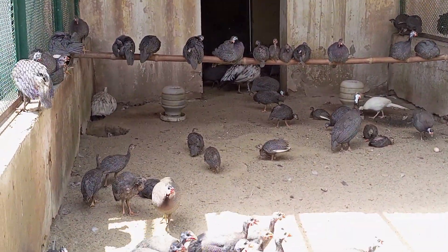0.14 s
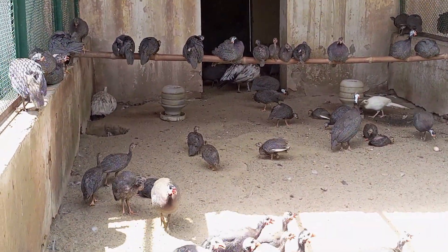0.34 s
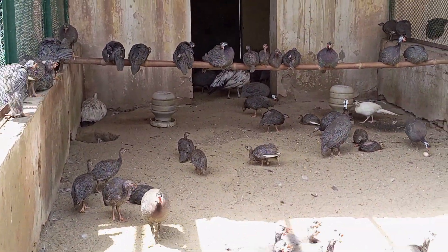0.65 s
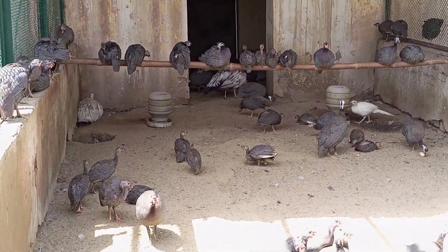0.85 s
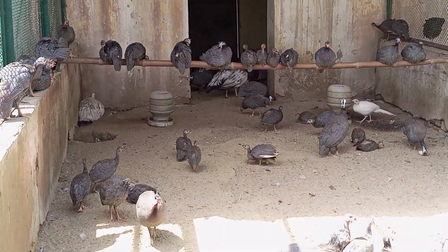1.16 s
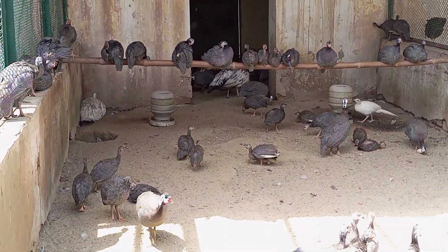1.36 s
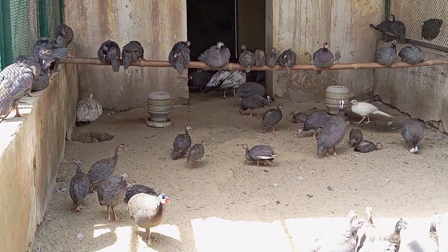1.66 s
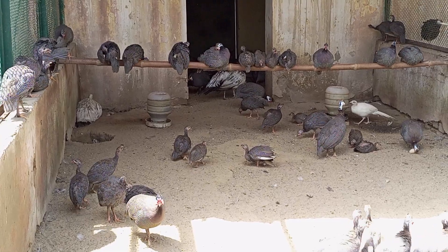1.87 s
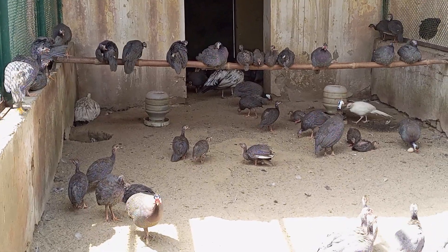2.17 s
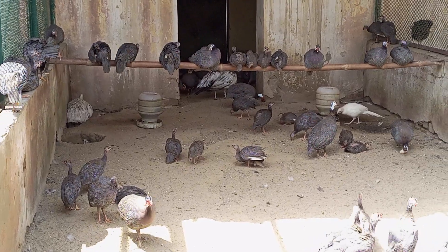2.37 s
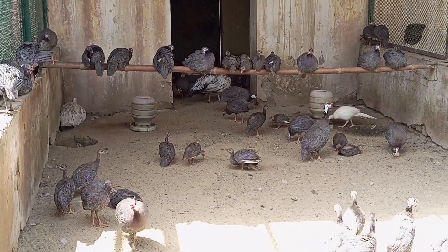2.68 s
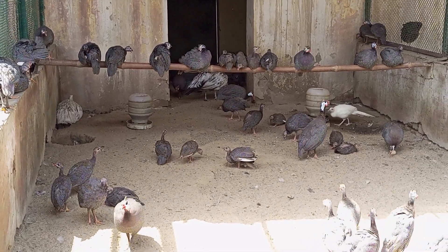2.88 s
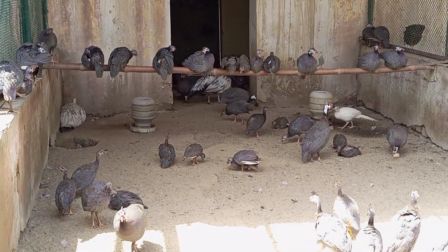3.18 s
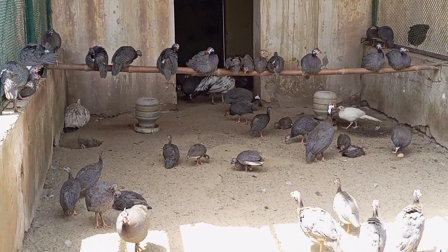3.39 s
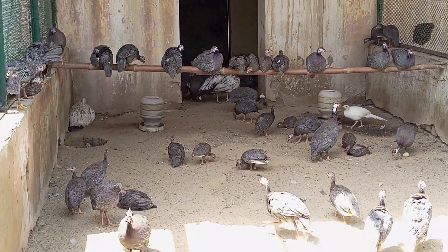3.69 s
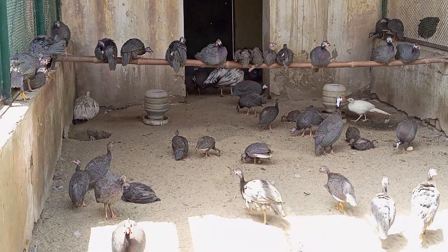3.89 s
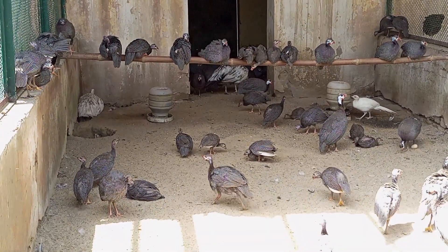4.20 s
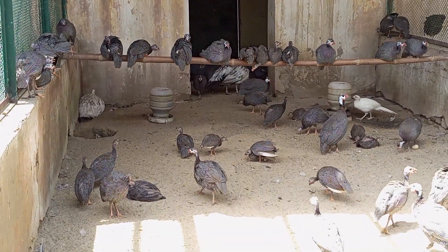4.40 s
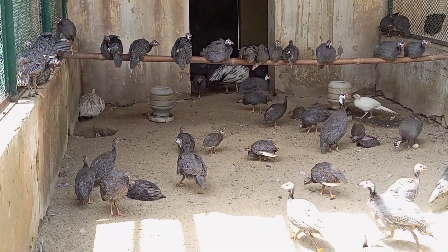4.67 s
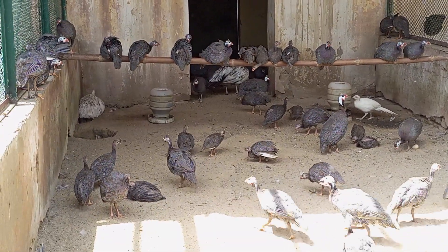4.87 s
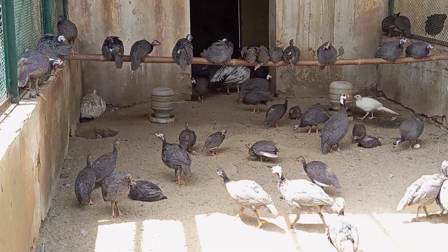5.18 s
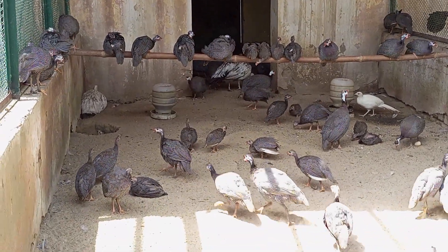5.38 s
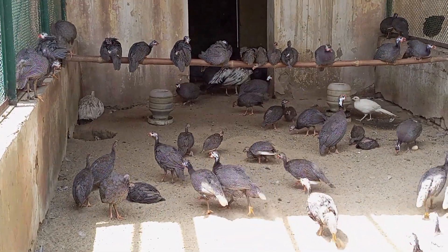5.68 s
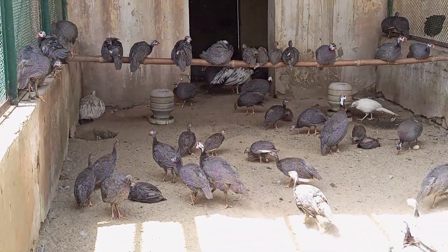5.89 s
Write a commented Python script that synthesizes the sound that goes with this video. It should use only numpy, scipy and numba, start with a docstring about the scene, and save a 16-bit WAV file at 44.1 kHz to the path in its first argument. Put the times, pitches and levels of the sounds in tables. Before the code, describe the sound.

A flock of guinea fowl calls in a concrete-walled outdoor pen. Bright, very short chirps jump out in the first second, then rasping squawks come at about one, two and three seconds. After a sparser, quieter stretch, another strong squawk barks just after five seconds and a weaker one near the end. Behind are hoarse wheezes, faint peeps and tiny pecking ticks. The walls give a short echo; the microphone catches a few dull dry taps.

```python
"""Near guinea fowl in a walled outdoor pen give rasping squawks (a buzz through a moving throat resonance)
and short gliding chirps (a sine with bill-coloured overtones). Further back others wheeze (buzz through one
broad resonance) and peep. Low tones (unsteady fundamental and octave) are a far fowl's faint crowing and,
at 5.975 s, the low body hum under a squawk. Beaks and feet tick on the dirt (noise bursts). The walls add
a short echo; a few dry taps at the microphone have none. Filtered noise gives faint outdoor air."""
import sys
import numpy as np
from scipy import signal
from scipy.fft import rfft, irfft, next_fast_len
from scipy.io import wavfile
from scipy.ndimage import uniform_filter1d
from numba import njit

SR = 44100
rng = np.random.default_rng(int(sys.argv[2]) if len(sys.argv) > 2 else 0)


def transcribe(signal):
    """Save signal, clipped to [-1, 1], as a 16-bit WAV file at the path in sys.argv[1]."""
    frames = np.atleast_2d(signal).T
    limited = np.clip(frames, -1, 1)
    pcm = np.round(limited * 32767).astype(np.int16)
    wavfile.write(sys.argv[1], SR, pcm)


N = 266628
TOP_HZ = 15740  # upper band limit


def undb(db):
    """Decibels to gain."""
    return 10 ** (np.asarray(db) / 20)


def unit(x):
    """Scale to rms 1."""
    return x / np.sqrt(np.mean(x ** 2) + 1e-20)


def gain_at(hz, points):
    """Gain of a (Hz, dB) spectrum, joined on a log axis, falling 12 dB/octave more below its first point."""
    point_hz, point_db = np.transpose(points)
    db = np.interp(np.log(hz + 1), np.log(point_hz), point_db)
    return undb(db) * np.minimum(hz / point_hz[0], 1) ** 2


def colour(x, points):
    """Filter a signal by a (Hz, dB) spectrum."""
    size = next_fast_len(len(x) + 512)
    bin_hz = np.arange(size // 2 + 1) * SR / size
    return irfft(rfft(x, size) * gain_at(bin_hz, points), size)[:len(x)]


def wobble(n, rate_hz):
    """Gaussian random values at rate_hz, joined by lines."""
    at = np.arange(n) * rate_hz / SR
    count = int(at[-1]) + 2
    return np.interp(at, np.arange(count), rng.standard_normal(count))


def add(out, start_s, x):
    """Mix a sound in at start_s; a negative start clips its head."""
    i = int(start_s * SR)
    x, i = x[max(-i, 0):], max(i, 0)
    out[i:i + len(x)] += x[:max(len(out) - i, 0)]


def play(table, voice):
    """Lay the calls of a table along the time axis."""
    out = np.zeros(N)
    for start_s, *row in table:
        add(out, start_s, voice(*row))
    return out


def rise_and_fall(length_s, peak_share):
    """Split a call's length at its loudest point."""
    share = np.clip(peak_share, .05, .95)
    return length_s * share, length_s * (1 - share)


def swell(rise_s, fall_s):
    """Time axis and rounded rise and fall of a short call."""
    t = np.arange(int((rise_s + fall_s) * SR)) / SR
    ramp = np.interp(t, [0, rise_s, rise_s + fall_s], [0, 1, 0])
    return t, np.sin(np.pi / 2 * ramp) ** 1.09


# air spectrum: (frequency [Hz], gain [dB])
AIR_SPECTRUM = [(25, -35), (75, -2), (160, -7), (300, -18.5), (800, -25), (1300, -23.5), (1950, -16.5),
                (2600, -25.5), (4000, -12.5), (4900, -13.5), (5900, -28.5), (7500, -32.5), (10000, -47),
                (15000, -50.5)]


def air(level_db=-71.5, swell_db=0.24, swell_hz=0.67):
    """Faint outdoor rumble and hiss: coloured noise, swelling slowly."""
    return unit(colour(rng.standard_normal(N), AIR_SPECTRUM)) * undb(level_db + swell_db * wobble(N, swell_hz))


# low tones: a far fowl's crowing, and at 5.975 s the low hum under a squawk:
# (start [s], length [s], start pitch [Hz], end pitch [Hz], level before pen [dB])
LOW_TONES = [ (-.03, 0.093, 433, 409, -67), (.19, 0.078, 397, 373, -71), (.32, 0.071, 481, 480, -73.5),
             (.64, .14, 823, 783, -76), (1.31, 0.2, 338, 362.3, -68.5), (1.48, 0.54, 506, 497.3, -67.5),
             (1.85, .32, 469, 372, -67.5), (2.18, 0.09, 357, 340, -68), (3.74, 0.15, 725, 659, -74),
             (5.975, .045, 397, 388, -62)]
LOW_PEAK_SHARE, LOW_ARCH_SHARE = 0.5, .025  # loudest point, of length; upward bow, of pitch
LOW_OCTAVE_DB = -18


def low_tone(length_s, start_hz, end_hz, db, waver=0.045, flutter_db=3):
    """Low note of voice or body, unsteady in pitch and strength: a fundamental and a weak octave."""
    t, envelope = swell(*rise_and_fall(length_s, LOW_PEAK_SHARE))
    glide_hz = np.interp(t, [0, length_s], [start_hz, end_hz])
    bow = LOW_ARCH_SHARE * np.sin(np.pi * t / length_s)
    hz = glide_hz * (1 + bow + waver * wobble(len(t), 60))
    phase = 2 * np.pi * np.cumsum(hz) / SR
    tone = np.sin(phase) + undb(LOW_OCTAVE_DB) * np.sin(2 * phase)
    return tone * envelope * undb(db + flutter_db * wobble(len(t), 30.5))


# bill gain on chirp overtones: (frequency [Hz], gain [dB])
CHIRP_BILL = [(1000, -14), (2100, -13), (3200, 1.5), (4100, 9), (5200, -9.5), (6100, -30), (8000, -50),
              (9600, -42.5), (11500, -60), (14000, -63.5)]


def chirp(rise_s, fall_s, start_hz, loudest_hz, end_hz, db, over_db, rough, jitter=0.11, shimmer=0.57):
    """Whistle on a parabolic glide; the bill colours its overtones, roughness makes it quaver."""
    t, envelope = swell(rise_s, fall_s)
    glide = np.polyfit([0, rise_s, rise_s + fall_s], [start_hz, loudest_hz, end_hz], 2)
    hz = np.polyval(glide, t)
    phase = 2 * np.pi * np.cumsum(hz * (1 + jitter * rough * wobble(len(t), 1100))) / SR
    orders = range(2, int(TOP_HZ / loudest_hz) + 1)
    overtones = sum(gain_at(k * hz, CHIRP_BILL) * np.sin(k * phase) for k in orders)
    quaver = 1 + shimmer * rough * wobble(len(t), 800)
    return (np.sin(phase) + undb(over_db) * overtones) * quaver * envelope * undb(db)


# near peeps: (start [s], length [s], pitch when loudest [Hz], glide [octaves], level before pen [dB])
NEAR_PEEPS = [ (-.01, 0.26, 1927, 0.016, -68.5), (.344, 0.036, 3450, 0.14, -46),
              (.378, 0.026, 3600, -.15, -37), (.565, .044, 3656, -.02, -28.5),
              (.755, 0.057, 1880, 0.34, -59), (.88, .16, 2310, 0.23, -54), (.925, .065, 3780, .07, -55),
              (1.44, 0.15, 1385, -0.014, -59), (1.65, 0.22, 2135, 0.13, -57.5),
              (1.808, 0.037, 1852, 0.024, -38.5), (1.85, .06, 2264, .14, -48.5),
              (1.924, 0.035, 4270, 0.05, -45), (1.945, 0.057, 2425, 0, -54.5), (1.95, 0.095, 1865, 0, -50),
              (2.165, 0.051, 3055, -0.18, -51), (2.255, 0.099, 1856, -0.087, -55),
              (2.682, 0.046, 1870, -0.12, -46), (2.7, 0.028, 3418, -0.093, -37),
              (2.82, 0.11, 5630, -0.014, -52.5), (3.335, 0.27, 1236, 0.24, -66.5),
              (3.42, 0.044, 5540, 0.057, -56.5), (3.678, 0.26, 2306, 0.066, -58),
              (4.43, 0.076, 4780, 0.038, -61), (4.47, 0.058, 2250, -0.036, -56),
              (4.964, 0.036, 1918, -0.09, -51.5), (4.983, 0.058, 1366, 0.081, -55),
              (5.124, 0.1, 1378, 0.1, -50), (5.72, 0.038, 1320, 0.15, -56.5),
              (5.75, 0.39, 1330, -0.011, -71)]
PEEP_ATTACK_S, PEEP_OVERTONES_DB, PEEP_ROUGH = .027, -17.5, 0.2  # attack is an upper limit; roughness 0-1


def peep(length_s, hz, octaves, db):
    """Nearly pure chirp on an even glide: a quick rise, then a fade."""
    rise_s = min(PEEP_ATTACK_S, length_s / 2)
    start_hz, end_hz = hz * 2 ** (octaves * (np.array([0, 1]) - rise_s / length_s))
    return chirp(rise_s, length_s - rise_s, start_hz, hz, end_hz, db, PEEP_OVERTONES_DB, PEEP_ROUGH)


def peeping(count=26, mean_db=-75):
    """Birds at the back peep softly at random, on nearly level notes."""
    rows = []
    for when, pitch, glide, loud in rng.random((count, 4)):
        hz = 2400 + 3100 * pitch
        arch_hz = [hz, hz * (1 + .04 * glide), hz * (.97 + .06 * glide)]
        rows.append((when * N / SR, .04, .05, *arch_hz, mean_db + 6 * (loud - .5), -15, .25))
    return play(rows, chirp)


def pecking(count=22, softest_db=-74, spread_db=6.7, decay_s=0.0043):
    """Beaks and claws tick on the dirt: decaying noise bursts at random, levels set before colouring."""
    out, t = np.zeros(N), np.arange(SR // 30) / SR
    for when, loud in rng.random((count, 2)):
        tick = rng.standard_normal(len(t)) * np.exp(-t / decay_s)
        add(out, when * N / SR, tick * undb(softest_db + spread_db * loud))
    return colour(out, [(1000, 2), (4500, -5), (6500, -14), (9000, -5.5), (12000, -33)])


def syrinx(hz, rough, jitter=0.0538, shimmer=0.68, uneven_db=7.0, scatter_rad=2.31, doubling=0.27):
    """Membranes buzz, overtones swelling singly; roughness upsets timing and strength and lets air through."""
    n = len(hz)
    phase = np.cumsum(hz * (1 + jitter * rough * (wobble(n, 490.3) + wobble(n, 91.55)))) / SR
    buzz = 0
    for k in range(1, int(TOP_HZ / hz.max())):
        # the windpipe delays each overtone differently, which smears the pulses
        lag_rad = scatter_rad * (rng.standard_normal() + rough * wobble(n, 110))
        buzz = buzz + undb(uneven_db * wobble(n, 43.9)) * np.cos(2 * np.pi * k * phase + lag_rad)
    # in spells, strong and weak cycles alternate
    alternation = doubling * wobble(n, 57.4) * np.cos(np.pi * phase)
    strength = np.exp(rough * (shimmer * wobble(n, 453.9) + alternation))
    hiss = .3 * unit(np.exp(-2 * (phase % 1)) * rng.standard_normal(n))
    return unit(buzz) * strength + rough * hiss


# hoarse calls further back:
# (start [s], length [s], level before pen [dB], resonance centre [Hz], resonance width [Hz])
WHEEZE_CALLS = [ (.29, 0.18, -70, 1750, 770), (.368, 0.048, -51.5, 3700, 1290),
                (.37, 0.039, -67, 6200, 1020), (.8, 0.22, -70, 1700, 600), (.93, 0.097, -58, 4800, 890),
                (1.06, 0.25, -70, 2700, 726), (1.285, 0.2, -55.5, 3850, 1800),
                (1.41, 0.23, -66, 3500, 2700), (1.625, 0.27, -59.5, 5400, 1115),
                (1.63, 0.23, -59.5, 3820, 1700), (2.11, .23, -76, 7260, 1390),
                (2.15, 0.45, -72.5, 3820, 2480), (3.93, .09, -57, 2800, 650), (3.98, .32, -61, 4400, 1600),
                (4.15, 0.37, -76, 1950, 630), (4.55, .11, -60.5, 4200, 850),
                (4.595, 0.037, -68, 7240, 2220), (4.77, 0.14, -70, 1720, 570),
                (4.76, 0.14, -68.5, 3640, 1010)]
WHEEZE_MEAN_HZ = 489.4  # pulse rate before arch and waver
WHEEZE_PEAK_SHARE, WHEEZE_ARCH_SHARE = .28, .04  # loudest point, of length; upward bow, of pitch


def wheeze(length_s, db, centre_hz, width_hz, rough=0.321, waver=0.026, pitch_spread=0.05):
    """Thin, hoarse call: arching, wavering buzz through one broad resonance, each call on its own pitch."""
    t, envelope = swell(*rise_and_fall(length_s, WHEEZE_PEAK_SHARE))
    bow = WHEEZE_ARCH_SHARE * np.sin(np.pi * t / length_s)
    hz = WHEEZE_MEAN_HZ * (1 + pitch_spread * rng.standard_normal() + bow)
    source = syrinx(hz * (1 + waver * wobble(len(t), 22)), rough)
    shape_hz = np.linspace(500, TOP_HZ, 60)
    shape_db = np.maximum(-12 * ((shape_hz - centre_hz) / width_hz) ** 2, -60)
    return unit(colour(source, np.column_stack([shape_hz, shape_db]))) * envelope * undb(db)


# arching, plunging whistles:
# (start [s], length [s], top pitch [Hz], level before pen [dB], overtones [dB], roughness [0-1])
WHISTLE_CALLS = [ (.36, 0.016, 3870, -31, -9, 0.46), (.518, 0.065, 4837, -27.5, 6.5, 0.13),
                 (1.948, 0.032, 4110, -36, -11, 0.42), (2.645, 0.063, 4600, -58, -18, .15),
                 (2.707, 0.026, 4450, -41.5, -22, 0.77), (3.888, 0.051, 4130, -47, 8, 0.48)]
WHISTLE_PEAK_SHARE = .72  # loudest point, of length
# pitch: (at start [share of top], when loudest [share of top], at end [share of top])
WHISTLE_PITCH_SHARES = (.92, .9, .7)


def whistle(length_s, top_hz, db, over_db, rough):
    """High chirp that grows as it arches over and is loudest as it plunges."""
    arch_hz = top_hz * np.array(WHISTLE_PITCH_SHARES)
    return chirp(*rise_and_fall(length_s, WHISTLE_PEAK_SHARE), *arch_hz, db, over_db, rough)


# dry taps: (start [s], push strength before body [dB])
DRY_TAPS = [(.6135, -4), (2.705, -3), (2.7115, -6.5), (2.788, -8.5)]
# body of a tap: (frequency [Hz], gain [dB])
TAP_SPECTRUM = [(200, -25.5), (400, -5), (580, 1), (900, -2.5), (1400, -19), (2500, -32), (5000, -51)]


def tap(db, rebound_db=-16, rebound_s=0.018):
    """Dull, dead tap: one push and a faint, brief rattle."""
    t = np.arange(SR // 50) / SR
    rattle = rng.standard_normal(len(t)) * np.exp(-t / rebound_s) / np.sqrt(rebound_s * SR / 2)
    push = undb(rebound_db) * rattle
    push[0] += 1
    return push * undb(db)


@njit
def resonance(x, hz, width_hz):
    """State-variable band-pass with a moving centre."""
    y, band, low = np.empty(len(x)), 0., 0.
    for i in range(len(x)):
        g, k = np.tan(np.pi * hz[i] / SR), width_hz / hz[i]
        v = (band + g * (x[i] - low)) / (1 + g * (g + k))
        band, low, y[i] = 2 * v - band, low + 2 * g * v, k * v
    return y


def steady(x, size=400):
    """Even out the loudness of a voice over a few cycles."""
    return x / np.sqrt(np.abs(uniform_filter1d(x ** 2, size)) + 1e-12)


# squawks: soft lead-in, burst, hold, release; at the break the voice jumps to a higher register
# (start [s], lead-in [s], hold [s], release [s], break after [s], lead-in level before pen [dB],
#  burst level before pen [dB], pulse rate at break, before sag [Hz], throat before [Hz], throat after [Hz])
HARSH_CALLS = [ (.935, .068, 0.035, 0.016, 0.098, -55.5, -45.5, 382.5, 1945, 1780),
               (1.99, .076, .022, 0.035, .078, -44, -34, 384.6, 1123, 1920),
               (2.855, 0.057, 0.052, 0.022, .086, -54, -34.5, 437, 1173, 1720)]
BARKED_CALLS = [ (5.142, 0.0906, 0.017, 0.054, .066, -48.5, -32.5, 403.5, 1430, 1670),
                (5.888, .098, .018, .035, .069, -51.5, -47, 405.8, 1440, 1680)]
# rasp colour of each voice: (frequency [Hz], gain [dB])
HARSH_BILL = [(400, -69), (700, -31.5), (1120, -4.5), (1420, -7.5), (1850, 2), (2400, -3), (3700, -3.5),
              (5000, -1.5), (5650, -8), (6400, -26), (7800, -33), (9200, -36), (10500, -36), (12500, -69)]
BARKED_BILL = [(400, -20), (580, -29), (800, -17.5), (1200, -8.5), (1600, -5), (2000, 3), (2600, -4.5),
               (3550, 3.5), (4100, -7.5), (5400, -9), (6400, -21), (7500, -14), (9000, -30), (12500, -62)]
# nearly shut bill, on the rasp: (frequency [Hz], gain [dB])
SHUT_BILL_SPECTRUM = [(900, 0), (5500, 0), (6500, -3), (9000, -3.5), (12000, -16)]
LOW_REGISTER_HZ, BREAK_S, SAG_HZ_PER_S = 371.4, 0.012, 102.6  # pulse rate; jump time; sink after break
ONSET_S, BURST_S, CRESCENDO_DB, SILENT_DB = 0.021, 0.011, 4, -24  # lead-in grows until the burst
LEAD_ROUGH, BURST_ROUGH, DYING_ROUGH = 0.634, .31, .42  # 0-1
START_RASP_DB, LEAD_RASP_DB, BURST_RASP_DB, DYING_RASP_DB = 0, 12, 11, 16  # re throat tone


def squawk(row, bill, throat_width_hz=260., gap_hz=3000., gap_width_hz=1700., open_db=-40, open_span_db=8):
    """Buzz rings a moving throat resonance and rasps broadly as the bill opens; the burst is clearest."""
    lead_s, hold_s, release_s, break_s, lead_db, burst_db, high_hz, throat_before_hz, throat_after_hz = row
    length_s = lead_s + hold_s + release_s
    t = np.arange(0, length_s, 1 / SR)
    stages_s = [0, ONSET_S, lead_s - BURST_S, lead_s, lead_s + hold_s, length_s]
    stages_db = [lead_db + SILENT_DB / 2, lead_db, lead_db + CRESCENDO_DB,
                 burst_db, burst_db, burst_db + SILENT_DB]
    db = np.interp(t, stages_s, stages_db)
    rough = np.interp(t, stages_s[2:], [LEAD_ROUGH, BURST_ROUGH, BURST_ROUGH, DYING_ROUGH])
    rasp_db = np.interp(t, [0, lead_s - BURST_S, lead_s, t[-1]],
                        [START_RASP_DB, LEAD_RASP_DB, BURST_RASP_DB, DYING_RASP_DB])
    jump_s = [break_s - BREAK_S / 2, break_s + BREAK_S / 2]
    sag_hz = SAG_HZ_PER_S * np.maximum(t - break_s, 0)
    hz = np.interp(t, jump_s, [LOW_REGISTER_HZ, high_hz]) - sag_hz
    throat_hz = np.interp(t, jump_s, [throat_before_hz, throat_after_hz])
    source = colour(syrinx(hz, rough), bill)
    tone = resonance(resonance(source, throat_hz, throat_width_hz), throat_hz, throat_width_hz)
    # in the soft start the bill is nearly shut and hollows and muffles the rasp
    shut = np.clip((open_db - db) / open_span_db, 0, 1) * (t < lead_s)
    hollow = source - resonance(source, np.full(len(t), gap_hz), gap_width_hz)
    muffled = colour(hollow, SHUT_BILL_SPECTRUM)
    rasp = (1 - shut) * source + shut * muffled
    voice = steady(steady(tone) + undb(rasp_db) * steady(rasp))
    return voice * undb(db) * signal.windows.tukey(len(t), .1)


# reedy clucks:
# (start [s], length [s], pitch when loudest [Hz], level before pen [dB], overtones [dB], roughness [0-1])
CLUCK_CALLS = [ (1.709, 0.04, 1106, -57.5, 11.5, 0.27), (1.752, 0.069, 1115, -60, 15, .45),
               (2.697, 0.029, 1147, -47, 4, 0.8), (2.785, 0.094, 1875, -54.5, -4.5, 0.31),
               (4.486, 0.021, 1038, -51.5, 14, .55), (5.108, 0.034, 2587, -62, 20, 0.21),
               (5.886, 0.045, 1409, -42.5, -14, .18)]
CLUCK_PEAK_SHARE, CLUCK_SAG_SHARE = 0.36, 0.032  # loudest point, of length; total fall each side, of pitch


def cluck(length_s, hz, db, over_db, rough):
    """Short, sagging chirp with bill-coloured overtones."""
    arch_hz = hz * (1 + CLUCK_SAG_SHARE), hz, hz * (1 - CLUCK_SAG_SHARE)
    return chirp(*rise_and_fall(length_s, CLUCK_PEAK_SHARE), *arch_hz, db, over_db, rough)


# echoes off ground and walls: (delay [s], level [dB])
PEN_ECHOES = [(.0068, -10.5), (0.016, -22), (.0345, -20), (.0415, -14)]


def pen(x, direct_db, tail_db, t60_s=0.24, treble_t60_s=0.086, build_s=0.036, split_hz=5000):
    """Direct sound, a few hard echoes and a short diffuse tail between the walls, treble dying sooner."""
    t = np.arange(int(.6 * SR)) / SR
    low_pass = signal.butter(2, split_hz, fs=SR, output="sos")
    high_pass = signal.butter(2, split_hz, "high", fs=SR, output="sos")
    low = signal.sosfilt(low_pass, rng.standard_normal(len(t)))
    high = signal.sosfilt(high_pass, rng.standard_normal(len(t)))
    tail = low * np.exp(-np.log(1000) * t / t60_s) + high * np.exp(-np.log(1000) * t / treble_t60_s)
    response = unit(tail * np.clip(t / build_s, 0, 1)) / np.sqrt(len(t)) * undb(tail_db)
    response[0] += undb(direct_db)
    for delay_s, db in PEN_ECHOES:
        response[int(delay_s * SR)] += undb(db)
    return signal.fftconvolve(x, response)[:N]


def scene():
    """Two groups pass through the pen, the second with a stronger tail; taps and air stay dry."""
    near = play(WHISTLE_CALLS, whistle) + play(CLUCK_CALLS, cluck) + play(NEAR_PEEPS, peep)
    for squawks, bill in ((HARSH_CALLS, HARSH_BILL), (BARKED_CALLS, BARKED_BILL)):
        for start_s, *row in squawks:
            add(near, start_s, squawk(row, bill))
    echoing = play(WHEEZE_CALLS, wheeze) + play(LOW_TONES, low_tone) + peeping() + pecking()
    birds = pen(near, direct_db=0.43, tail_db=-12.5) + pen(echoing, direct_db=1.0, tail_db=-4.5)
    taps = colour(play(DRY_TAPS, tap), TAP_SPECTRUM)
    return (birds + taps + air())[None]


def record(dry):
    """The recorder cuts the top: steep elliptic low-pass at TOP_HZ."""
    return signal.sosfilt(signal.ellip(8, .2, 70, TOP_HZ, fs=SR, output="sos"), dry)


dry = scene()
out = record(dry)
transcribe(out)
```